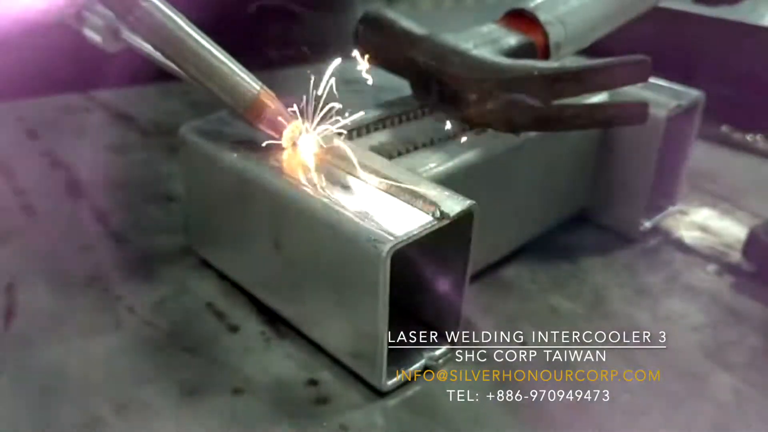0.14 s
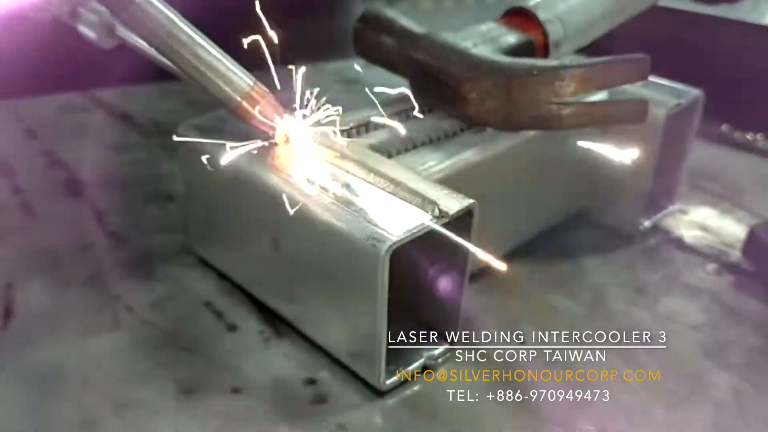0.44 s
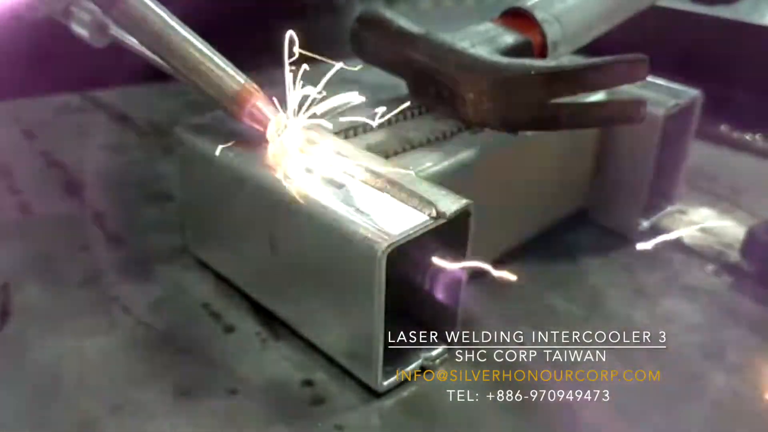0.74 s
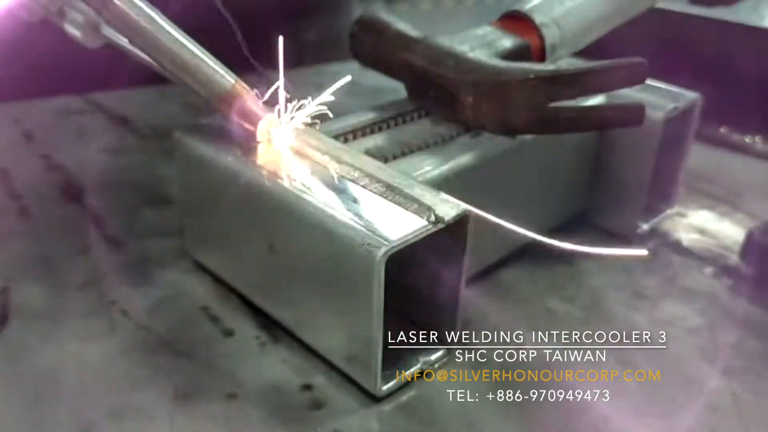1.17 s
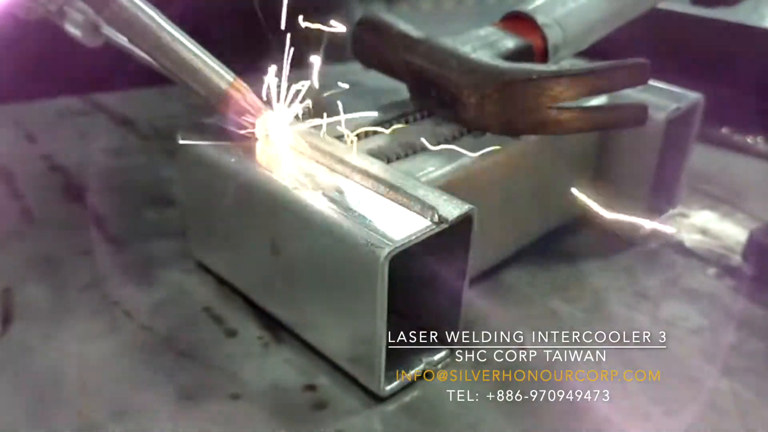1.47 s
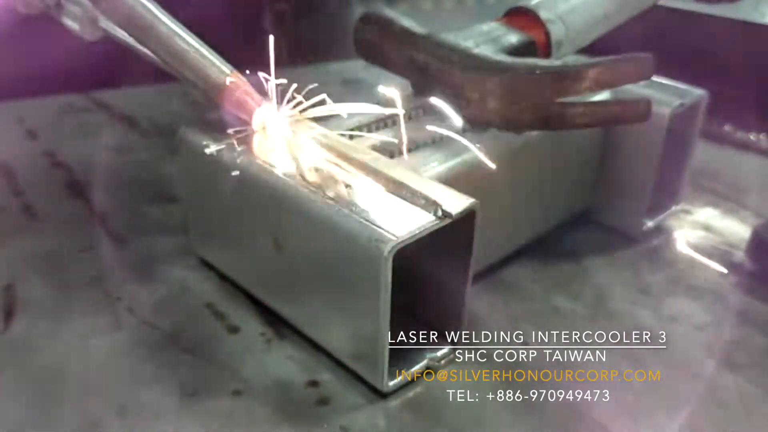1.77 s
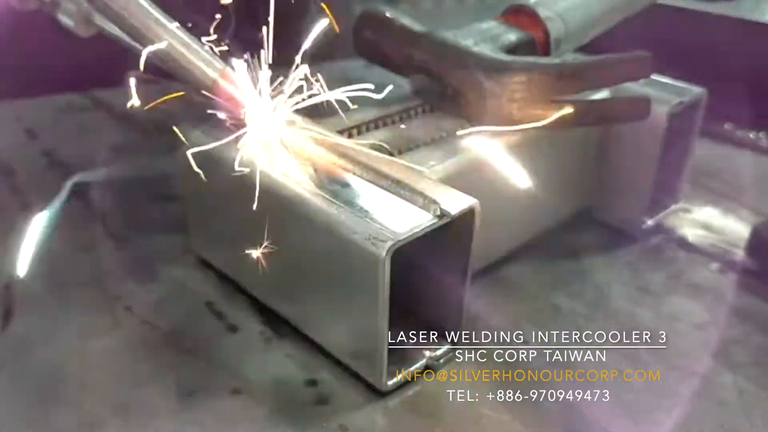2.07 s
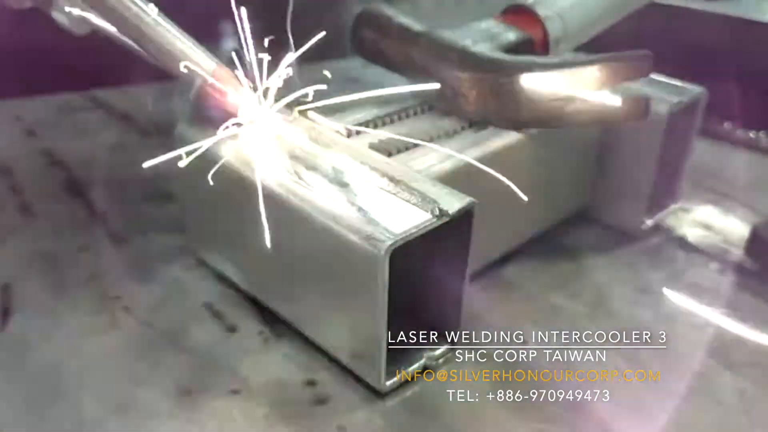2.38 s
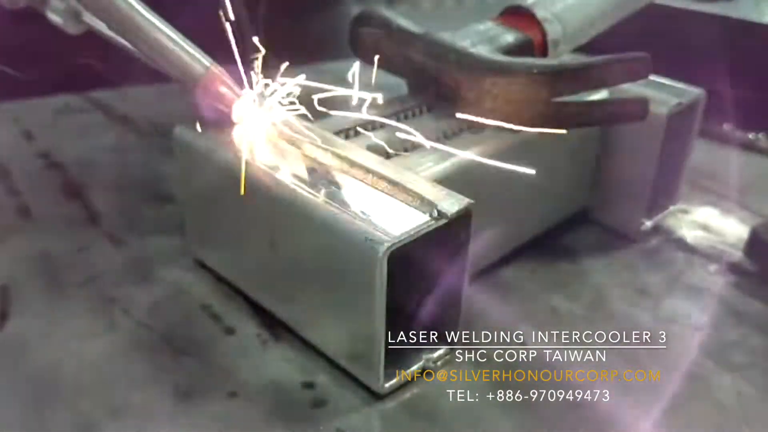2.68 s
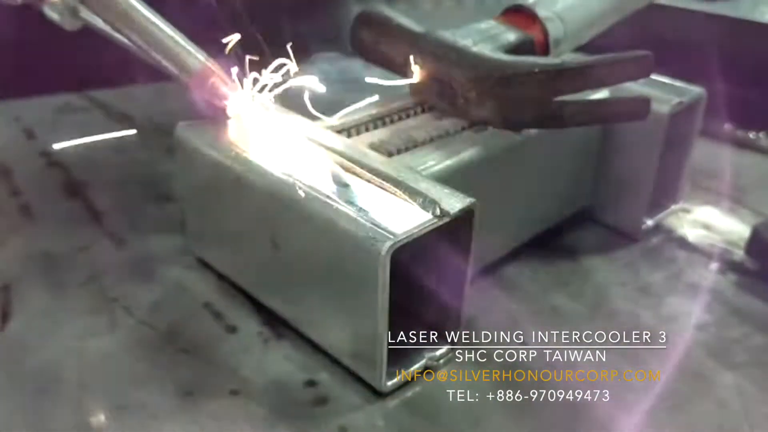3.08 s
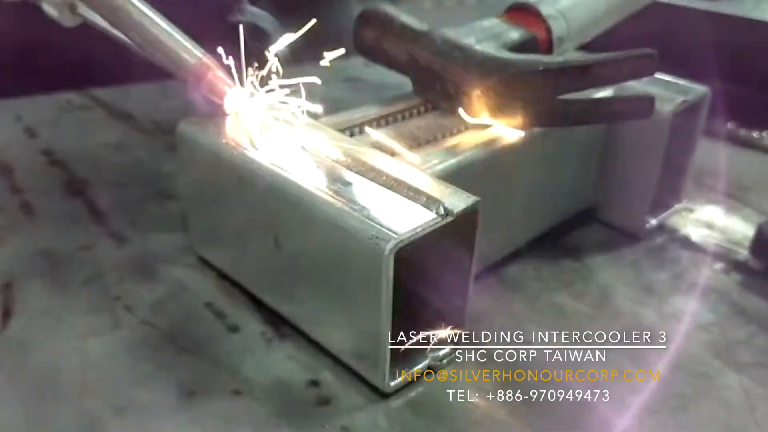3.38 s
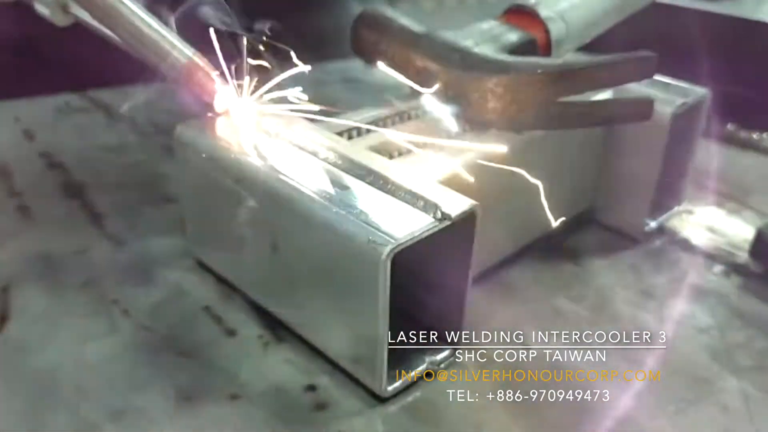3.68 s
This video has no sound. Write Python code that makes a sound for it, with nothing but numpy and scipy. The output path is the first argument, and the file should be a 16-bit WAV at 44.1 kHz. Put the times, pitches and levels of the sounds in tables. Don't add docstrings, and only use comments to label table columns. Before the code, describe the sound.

A welding torch hisses sharply and crackles without pause over a faint low factory rumble.

```python
import sys
import numpy as np
from scipy import signal
from scipy.fft import rfft, irfft, dct, next_fast_len
from scipy.io import wavfile
from scipy.ndimage import uniform_filter1d, map_coordinates

SR = 44100
rng = np.random.default_rng(int(sys.argv[2]) if len(sys.argv) > 2 else 0)


def transcribe(signal):
    frames = np.atleast_2d(signal).T
    limited = np.clip(frames, -1, 1)
    pcm = np.round(limited * 32767).astype(np.int16)
    wavfile.write(sys.argv[1], SR, pcm)


def volts(x):
    e = np.asarray(x, float) / 20
    return 10 ** e


N = 168903
WOBBLE_HZ = 42


def unit(x):
    return x / np.sqrt(np.mean(x ** 2) + 1e-20)


def curves(rows, t):
    s, *cols = np.transpose(rows)
    return [np.interp(t, s, c) for c in cols]


def along(points, hz):
    f, v = np.transpose(points)
    level_db = np.interp(np.log(hz + 1), np.log(f + 1), v)
    return volts(level_db - 10 * np.maximum(hz / f[-1] - 1, 0))


def drift(rate):
    knots = rng.standard_normal(int(N * rate / SR) + 4)
    return map_coordinates(knots, [np.arange(N) * rate / SR])


def filtered(x, response):
    m = next_fast_len(N + 8192)
    return irfft(rfft(x, m) * response(np.fft.rfftfreq(m, 1 / SR)), m)[:N]


def patchy(patch_db):
    z = signal.stft(rng.standard_normal(N + 512), nperseg=512)[2]
    field = uniform_filter1d(rng.standard_normal(z.shape), size=6, axis=0)
    field = uniform_filter1d(field, size=4, axis=1)
    return signal.istft(z * volts(patch_db * unit(field)), nperseg=512)[1][:N]


def peak(f, hz, width):
    return 1 / (1 + ((f - hz) / width) ** 2) ** 2


def gas():
    # time in seconds, gas level in dB, travel along the seam from 0 to 1.
    gas_path = [(0, -42.5, 0.07), (.7, -42, 0.29), (.82, -39.5, 0.3), (.95, -43, 0.2), (1.1, -42.5, 0.2),
                (1.55, -42.5, 0.28), (1.9, -40.5, 0.67), (2.3, -42.5, 0.53), (2.6, -41, 0.53),
                (2.88, -44, .6), (3.03, -41.5, 0.5), (3.17, -39, 0.96), (3.25, -41, 0.7), (3.4, -38, 0.99),
                (3.55, -38.5, 0.9), (3.64, -40, 1), (3.72, -37.5, 1), (3.83, -37.5, 1)]
    # centre in Hz, width in Hz, level at the seam's start in dB,
    # level at its end in dB.
    resonances = [(3513, 300, -16.5, -16), (4200, 344, -6.5, -10.5), (5047, 360, -12.5, -12),
                  (5690, 270, -14, -12), (6355, 200, -11, -13.5), (6874, 180, -8.5, -8),
                  (7456, 140, -7, -3), (7974, 230, -2.5, -2), (8204, 133, 2.5, -14), (8973, 397, -2.5, 4),
                  (10230, 590, -12.5, -10), (11250, 600, -11.5, -15.5), (11760, 280, -7, -16.5)]
    t = np.arange(N) / SR
    level_db, travel = curves(gas_path, t)
    travel = np.clip(travel, 0, 1)
    jet = patchy(1.11)

    def ring(column):
        def response(f):
            power = volts(2 * -26) * (f > 3000)
            for row in resonances:
                power = power + volts(2 * row[column]) * peak(f, row[0], row[1])
            return np.sqrt(power)
        return unit(filtered(jet, response))

    seam_start, seam_end = ring(2), ring(3)
    swing_db = 0.92 * np.cos(2 * np.pi * WOBBLE_HZ * t + 1.05)
    flutter_db = 0.91 * drift(70)
    hiss = (1 - travel) * seam_start + travel * seam_end
    return volts(level_db + 2.0 + swing_db + flutter_db) * hiss


def pops(s, size, width_s):
    # frequency in Hz, gain in dB.
    pop_colour = [(60, -7), (300, -3), (1000, 1), (2200, 6.5), (2900, 10), (3600, 6.5), (5000, -41),
                  (9000, -19)]
    skew = .35
    k = np.arange(-24, 25)
    bells = size[:, None] * np.exp(-.5 * (k / (SR * width_s[:, None])) ** 2)
    at = np.clip(np.round(s * SR).astype(int)[:, None] + k, 0, N - 1)
    pressure = np.bincount(at.ravel(), bells.ravel(), N)
    return filtered(pressure, lambda f: along(pop_colour, f) * np.exp(1j * skew))


def spit():
    # time in seconds, spitting level in dB.
    spitting = [(0, -51), (.15, -49.5), (.3, -52.5), (.6, -50), (.75, -52), (.83, -50.5), (.95, -55),
                (1.12, -47.5), (1.6, -50), (1.78, -50.5), (2.2, -48.5), (2.58, -49.5), (2.64, -55.5),
                (2.76, -51), (2.94, -49), (3.0, -53.5), (3.3, -54), (3.83, -52)]
    pops_max = 6000
    when, keep, way, big = rng.random((pops_max, 4)).T
    s = when * N / SR
    mean_db = np.mean(curves(spitting, np.arange(N) / SR))
    more = volts(curves(spitting, s)[0] - mean_db)
    clump = volts(3 * drift(30))[(when * N).astype(int)]
    swing = 1 + 0.53 * np.cos(2 * np.pi * WOBBLE_HZ * s + 0.68)
    share = .22 * more * clump * swing
    sounding = np.clip(20 * (share - keep), 0, 1)
    size_db = np.minimum(-5 * np.log(big + 1e-9), 6)
    direction = np.where(way < .6, -1, 1)
    size = sounding * np.sqrt(more) * volts(size_db) * direction
    width_s = .000075 * np.exp(0.37 * rng.standard_normal(pops_max))
    return volts(mean_db + 0.5) * unit(pops(s, size, width_s))


def bursts():
    # time in seconds, peak in dB, direction of the pressure (1 or -1).
    spatters = [(0.0837, -31.5, 1), (0.1393, -32.1, 1), (0.1631, -33.5, 1), (0.3965, -32.5, 1),
                (0.4145, -29, -1), (0.5235, -33.5, 1), (0.5426, -30.5, -1), (0.615, -28, 1),
                (0.6625, -29.5, 1), (0.6853, -30.5, -1), (0.8341, -30.5, -1), (1.0966, -30, -1),
                (1.1062, -30.5, 1), (1.1091, -32, 1), (1.1235, -33, 1), (1.1422, -32, -1),
                (1.1692, -33.5, 1), (1.1862, -35, 1), (1.258, -28.5, -1), (1.2828, -31, 1),
                (1.3365, -32.5, 1), (1.4448, -34.5, -1), (1.4747, -34, -1), (1.4953, -31, -1),
                (1.5147, -29, -1), (1.5213, -34.5, -1), (1.5273, -31, -1), (1.576, -31.1, -1),
                (1.6887, -34, 1), (1.7116, -34, 1), (1.7365, -30, 1), (1.8614, -29, -1),
                (1.864, -30.5, -1), (1.925, -29.5, -1), (1.9511, -31.5, -1), (2.0075, -33.5, -1),
                (2.0435, -28.5, -1), (2.069, -30.5, 1), (2.0732, -31.5, -1), (2.0887, -34.5, 1),
                (2.1401, -31, 1), (2.1629, -31, 1), (2.165, -29.9, -1), (2.1933, -32, 1),
                (2.229, -35.5, -1), (2.2807, -31.5, -1), (2.3071, -34.5, -1), (2.3336, -30, -1),
                (2.356, -31.5, -1), (2.3585, -30, 1), (2.4221, -30.5, -1), (2.471, -28, -1),
                (2.4764, -31.8, -1), (2.4988, -30.5, -1), (2.5941, -27.5, -1), (2.7433, -31.5, -1),
                (2.7529, -33, -1), (2.9263, -27.8, -1), (3.5217, -31, -1), (3.7539, -32, 1)]
    # time in seconds, peak in dB, direction of the pressure (1 or
    more_spatters = [(0.1362, -28.5, -1), (0.2584, -35.5, 1), (0.3321, -32.5, -1), (0.378, -32, 1),
                     (0.4717, -35, -1), (0.562, -32.5, -1), (0.807, -35.5, -1), (0.8118, -30, -1),
                     (0.8533, -32, -1), (1.0085, -32, -1), (1.0265, -33.5, 1), (1.0563, -32, -1),
                     (1.135, -30, -1), (1.1446, -41, -1), (1.151, -37, -1), (1.1913, -34, -1),
                     (1.2093, -33.7, 1), (1.2244, -36, -1), (1.2795, -34.0, 1), (1.2854, -32.5, -1),
                     (1.414, -37, 1), (1.4247, -32.5, -1), (1.4486, -32.5, 1), (1.4531, -32, -1),
                     (1.4993, -31.5, -1), (1.5562, -32, -1), (1.5646, -32.5, 1), (1.5723, -31, -1),
                     (1.6102, -33.5, -1), (1.6131, -33, 1), (1.6825, -32, -1), (1.709, -31.5, -1),
                     (1.7339, -33, -1), (1.8126, -31.5, 1), (1.817, -33.9, -1), (1.8565, -36.5, 1),
                     (1.8754, -30, -1), (1.992, -33.8, -1), (2.0224, -32, 1), (2.3293, -31.5, 1),
                     (2.339, -37, 1), (2.353, -35, 1), (2.364, -33, 1), (2.378, -33.3, -1),
                     (2.3798, -33.5, -1), (2.3991, -32.5, -1), (2.439, -32.5, -1), (2.4451, -36, 1),
                     (2.4547, -29, -1), (2.5373, -31.5, 1), (2.5652, -33.5, -1), (2.5716, -37, 1),
                     (2.84, -34, -1), (2.883, -34, 1), (2.9096, -36, -1), (2.95, -33.3, -1),
                     (2.9593, -36.5, -1), (3.309, -32.5, 1), (3.546, -31.5, -1), (3.6172, -33, -1)]
    total = np.zeros(N)
    for rows, trim_db in ((spatters, -0.5), (more_spatters, 0)):
        s, db, way = np.transpose(rows)
        half_width_s = np.full(len(s), .00009)
        total = total + pops(s, volts(db + trim_db) * np.sign(way), half_width_s)
    return total


def melt():
    return spit() + bursts()


def shop():
    # frequency in Hz, level in dB per Hz.
    rumble_colour = [(3, 12), (15, 6.5), (30, -6.5), (120, -4), (300, -5), (600, -12), (2500, -6.5),
                     (3300, -17.5)]
    # centre in Hz, width in Hz, level in dB.
    machine_hums = [
        (41.8, 10, -70),
        (116.6, 8, -68.5),
        (297.7, 3.9, -79.5),
    ]
    # time in seconds, swell in dB.
    swell = [
        (0, -0.5),
        (1.2, 1.5),
        (2.2, 2),
        (3.15, -.5),
        (3.35, 3),
        (3.83, 2),
    ]
    floor = volts(-52.5) * unit(filtered(patchy(1.5), lambda f: along(rumble_colour, f)))
    for hz, width, db in machine_hums:
        hum = filtered(rng.standard_normal(N), lambda f: peak(f, hz, width))
        floor = floor + volts(db) * unit(hum)
    return floor * volts(curves(swell, np.arange(N) / SR)[0])


def glitches():
    # time in seconds, level in dB.
    ticks = [
        (1.0495, -28),
        (2.0495, -37),
    ]
    s, db = np.transpose(ticks)
    return np.bincount(np.round(s * SR).astype(int), volts(db), N)


def phone(x):
    # frequency in Hz, step in dB.
    step_colour = [(300, -14), (1500, -8), (2500, -1), (3450, 7.5), (4300, 4.5), (5000, 5.5), (6300, 3.5),
                   (8500, 5.5)]
    # start in seconds, length in seconds, coarser steps in dB
    starved = [(.171, 0.052, 5.5), (.277, 0.0062, 1.5), (.299, .086, 3), (.448, 0.0025, 3),
               (.576, 0.016, 3.5), (.64, 0, 2.5), (.704, 0.0063, 2), (.768, 0.026, 4), (.896, .064, 1.5),
               (1.323, .086, 1.5), (.981, .043, 3.5), (1.451, 0, 2), (1.643, 0.006, 3.5),
               (1.749, 0.034, 5.5), (1.835, 0, 5), (1.899, 0.03, 5), (2.005, 0.059, 3), (2.069, 0, 4.5),
               (2.112, 0, 4), (2.411, 0.026, 3.5), (2.624, 0.12, 2), (2.795, 0.021, 1), (2.901, 0, 3.5),
               (2.987, 0.003, 5.5), (3.029, .022, -3), (3.264, .022, -2.5), (3.499, .022, -2),
               (3.584, .043, -3), (3.712, .064, -1.5), (3.072, .086, 4), (3.221, .022, 1),
               (3.307, 0.035, 4), (3.371, 0.091, 2), (3.541, 0.032, 4), (3.648, 0.049, 1.5),
               (3.797, .022, 3)]
    n, h, shift = 1024, 512, 14
    up, down = 160, 147
    rate = SR * up / down
    x = signal.resample_poly(x, up, down)

    win = signal.windows.kaiser_bessel_derived(2 * n, 4 * np.pi)
    rows = np.pad(x, (2 * n - shift, 3 * n - (len(x) - shift) % n)).reshape(-1, n)
    a, b, c, d = np.split(np.hstack([rows[:-1], rows[1:]]) * win, 4, axis=1)
    z = dct(np.hstack([-c[:, ::-1] - d, a - b[:, ::-1]]), type=4, norm="ortho")
    hz = (np.arange(n) + .5) * rate / (2 * n)

    start, length, coarser_db = np.transpose(starved)
    late = ((np.arange(len(z)) - 1) * n + shift)[:, None] / rate - start
    starved_db = ((late > -h / rate) & (late < length + h / rate)) @ coarser_db
    band_db = 1.5 * np.repeat(rng.standard_normal((len(z), n // 16)), 16, axis=1)
    frame_db = .7 * rng.standard_normal((len(z), 1))
    jitter_db = frame_db + band_db + starved_db[:, None] - 1

    loud = np.sqrt(np.mean(z ** 2, axis=1, keepdims=True) + 1e-20)
    pop_range = (hz > 500) & (hz < 2600)
    popping = np.sqrt(np.mean(z[:, pop_range] ** 2, axis=1, keepdims=True) + 1e-20) / loud
    step = loud.mean() * (loud / loud.mean()) ** .2 * popping ** -.25
    step = step * along(step_colour, hz) * volts(jitter_db)
    rounded = np.sign(z) * np.floor(abs(z) / step + .4) * step * (hz < 12030)

    u = dct(rounded, type=4, norm="ortho")
    p, q = u[:, :h], u[:, h:]
    y = np.hstack([q, -q[:, ::-1], -p[:, ::-1], -p]) * win
    joined = (y[1:, :n] + y[:-1, n:]).ravel()[n - shift:]
    return signal.resample_poly(joined, down, up)[:N]


def scene():
    return (gas() + melt() + shop())[None]


def low_pass(x):
    return signal.sosfilt(signal.butter(12, 16000, fs=SR, output="sos"), x)


def record(dry):
    mix = (phone(dry[0]) + glitches())[None]
    return low_pass(mix)


dry = scene()
out = record(dry)
transcribe(out)
```